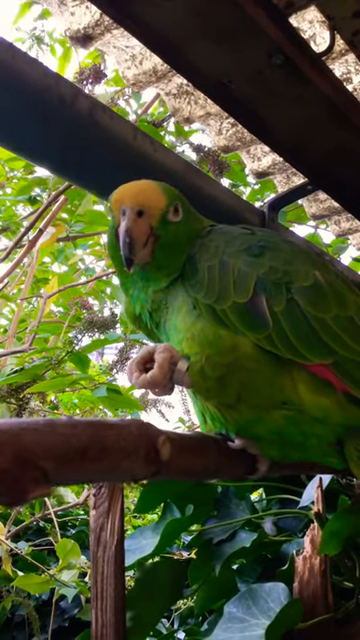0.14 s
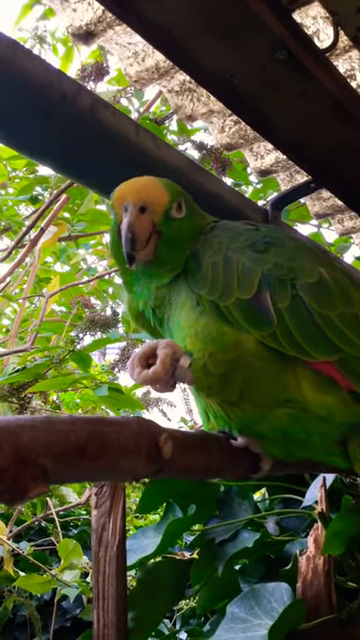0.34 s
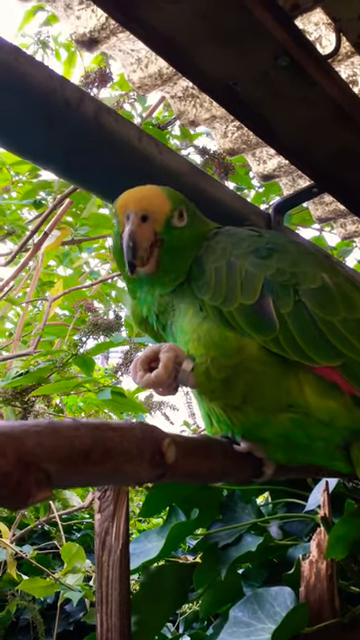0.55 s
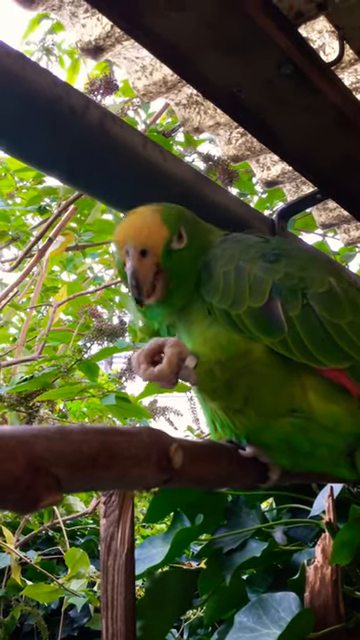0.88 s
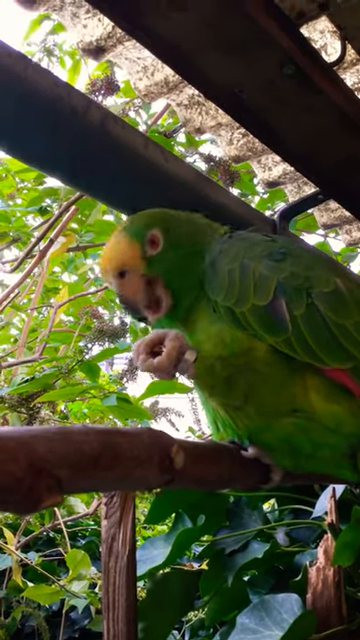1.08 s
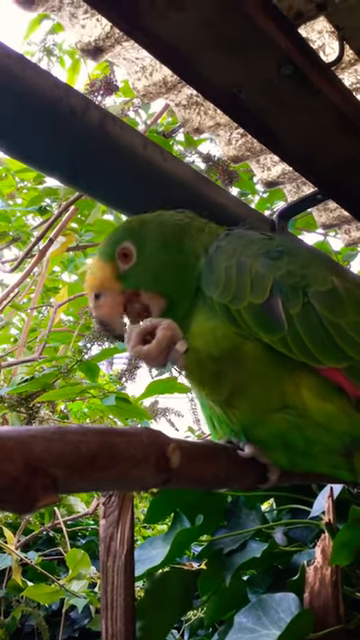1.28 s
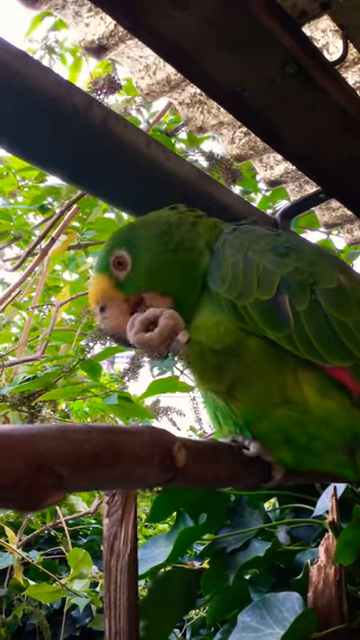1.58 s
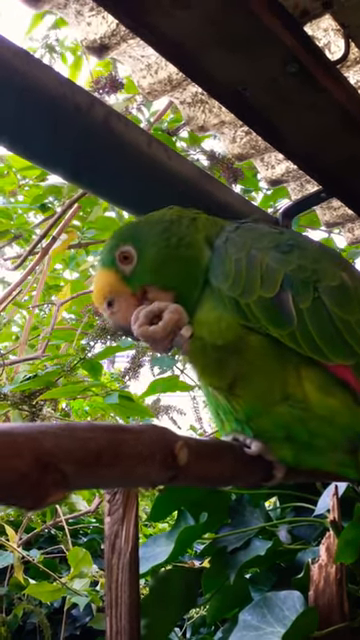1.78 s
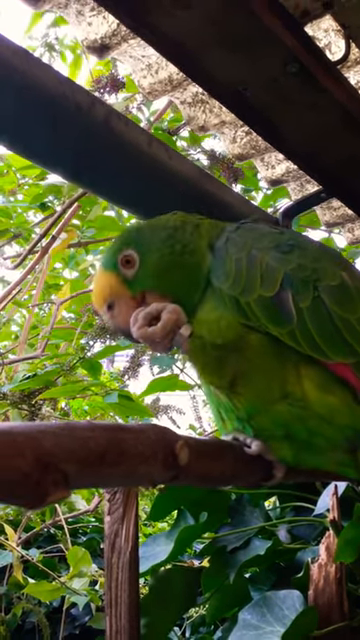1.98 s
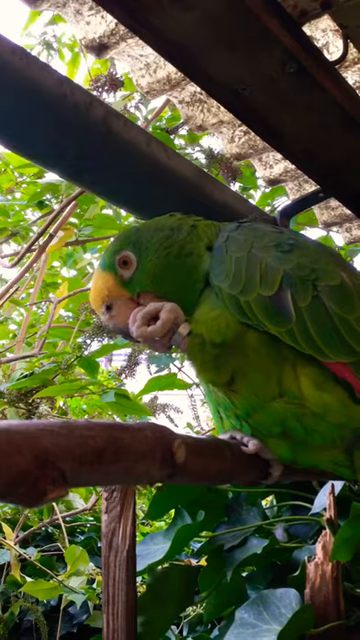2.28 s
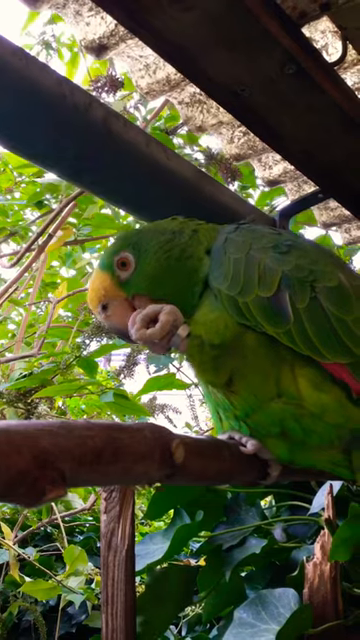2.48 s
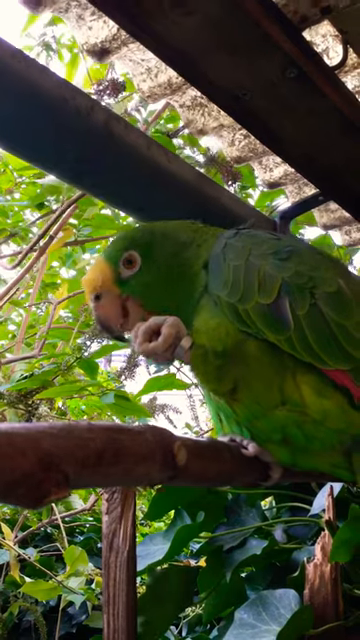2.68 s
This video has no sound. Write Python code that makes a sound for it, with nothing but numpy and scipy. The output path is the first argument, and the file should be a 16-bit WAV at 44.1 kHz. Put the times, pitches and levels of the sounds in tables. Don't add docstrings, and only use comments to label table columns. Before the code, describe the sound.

Nut shell cracked by a parrot's beak under a garden roof, heard close: tiny bright clicks grow denser, the shell splits with a brief hollow ring, crumbs crackle, while distant traffic slowly swells and a far saw starts.

```python
import sys
import numpy as np
from scipy import signal
from scipy.fft import rfft, irfft
from scipy.io import wavfile
from scipy.ndimage import uniform_filter1d

SR = 44100
rng = np.random.default_rng(int(sys.argv[2]) if len(sys.argv) > 2 else 0)


def put_to_file(sound):
    columns = np.atleast_2d(sound).T
    safe = np.clip(columns, -1, 1)
    whole_steps = np.round(safe * 32767)
    wavfile.write(sys.argv[1], SR, whole_steps.astype(np.int16))


def attenuation_scalar(level_db):
    decades = np.asarray(level_db, float) / 20
    return 10 ** decades


N = 125244

# (frequency [Hz], level [dB], t60 [s])
SHELL_MODES = [(950, 9.5, .03), (1230, 11, .02), (1560, 10, .031), (1775, 8, .03), (2148, 5, .038),
               (2350, 3, .016), (2881, 4, .028), (3522, 11, .022), (3949, 1, .036), (4670, 6, .02),
               (5076, 10, .008), (5500, 4, .024), (5950, -5, .03), (8090, -9, .04)]


def nibbles():
    # (time [s], peak level [dB], centre of the splinter ring [Hz])
    fractures = [(0.1208, -57.5, 10000), (.416, -66, 14600), (.627, -60, 14000), (.783, -65, 14400),
                 (.945, -67, 14000), (1.638, -64, 11000), (1.642, -53.5, 13700), (1.719, -56, 13600),
                 (1.9148, -51, 16500), (1.9235, -64, 14000), (1.9777, -50, 17000), (2.0098, -52.5, 12000),
                 (2.0132, -56, 11000), (2.092, -60, 13000), (2.094, -66, 12700), (2.1093, -37, 10000),
                 (2.1104, -43, 10500), (2.151, -59, 10000), (2.2516, -35, 11000), (2.2527, -31.5, 13000),
                 (2.2529, -42, 7400), (2.2873, -63, 10000), (2.2923, -55, 13000), (2.2945, -52, 9600),
                 (2.2946, -43, 17500), (2.446, -60, 10500), (2.563, -64, 11500), (2.648, -54, 13600),
                 (2.7475, -59, 13500), (2.771, -61, 13000)]
    # (frequency [Hz], level [dB], share of the decay [1])
    splinter = [(6000, -2, 1.6), (7900, -17, 1.7), (9500, 11, 1.6), (9800, -7, 1.3), (9980, 6, 1.4),
                (10800, 7, 1.9), (12700, 5, .9), (12700, -19, .9), (14200, 7, 1.2), (15100, 2, 1.0),
                (15500, 8, .9)]
    ring_db, ring_t60_s, ring_octaves = -11, .006, .38
    grit_db, grit_t60_s, grit_spread_db = -23, .012, 3
    rustle_db, rustle_per_s, rustle_hz = -76, 51, 13500
    modes = np.array(splinter) * [1, 1, ring_t60_s]
    age = np.arange(2000) / SR
    out = np.zeros(N)
    for at_s, db, hz in fractures:
        uneven = grit_spread_db * (rng.exponential(size=2000) - 1)
        grit = rng.standard_normal(2000) * attenuation_scalar(grit_db + uneven - 60 * age / grit_t60_s)
        grit[0] = 1
        snap = splinter_band(grit, hz)
        snap = snap / abs(snap[:40]).max()
        tone = strike(grit, modes, hz, ring_octaves)
        add(out, at_s, attenuation_scalar(db) * (snap + attenuation_scalar(ring_db) * tone))
    chance = rustle_per_s * attenuation_scalar(6.0 * walk(12)) / SR
    specks = (rng.random(N) < chance) * rng.standard_normal(N)
    return out + attenuation_scalar(rustle_db) * splinter_band(specks, rustle_hz)


def splinter_band(x, hz):
    edges_hz = [hz * (1 - .65 / 2), min(hz * (1 + .65 / 2), 19000)]
    return signal.sosfilt(signal.butter(3, edges_hz, "bp", fs=SR, output="sos"), x)


def cracks():
    # (time [s], peak level [dB], favoured pitch [Hz])
    blows = [
        (2.1094, -26.5, 3500),
        (2.1117, -46, 5500),
        (2.1137, -54, 1000),
        (2.1512, -42, 1790),
        (2.180, -53, 3000),
        (2.2475, -58, 3500),
        (2.1215, -58, 5500),
        (2.1511, -50, 3400),
    ]
    held_modes = np.array(SHELL_MODES) * [1, 0, .7]
    out = np.zeros(N)
    for at_s, db, hz in blows:
        if db > -35:
            blow = split()
        else:
            push = np.r_[np.hanning(int(SR / hz / 2)), np.zeros(4000)]
            blow = strike(push, held_modes, hz, octaves=.22)
        add(out, at_s, attenuation_scalar(db) * blow)
    return out


def split():
    rise_cycles, grip_s, grip_db = .5, .0028, -6.5
    age = np.arange(4000) / SR
    body = 0
    for hz, db, t60 in SHELL_MODES:
        rise = 1 - np.exp(-age * hz / rise_cycles)
        body = body + attenuation_scalar(db - 60 * age / t60) * rise * np.sin(2 * np.pi * hz * age)
    body = body * attenuation_scalar(grip_db * np.clip((age - grip_s) / .0008 + .5, 0, 1))
    return body / abs(body).max()


def strike(x, modes, pitch_hz, octaves):
    body = 0
    for hz, db, t60 in modes:
        off_pitch = np.log2(hz / pitch_hz) / octaves
        gain = attenuation_scalar(db + 3.8 * (rng.random() - .5) - 4.9 * off_pitch ** 2)
        body = body + gain * ring(x, hz, t60, rng.random())
    return body / abs(body).max()


def ring(x, hz, t60, phase):
    pole = np.exp(2j * np.pi * min(hz, .45 * SR) / SR - np.log(1000) / (t60 * SR))
    return (signal.lfilter([1], [1, -pole], x) * np.exp(2j * np.pi * phase)).imag


def add(out, at_s, grain):
    i = int(at_s * SR)
    out[i:i + len(grain)] += grain[:N - i]


def brushes(t):
    # (time [s], level [dB], length [s])
    puffs = [(.003, -77, 0.005), (0.11, -78, .015), (.345, -84, .012), (.419, -84, .004),
             (0.612, -78, 0.02), (.945, -80, .015), (1.923, -83, 0.018), (2.303, -78, .012),
             (2.324, -82, .002), (2.452, -84, .008), (2.56, -85, .015)]
    # (time [s], level [dB], t60 [s])
    crumbles = [
        (2.1105, -54, .035),
        (2.112, -68, .36),
        (2.151, -72, 0.055),
        (2.180, -85, 0.093),
    ]
    grain = rng.standard_normal(N) * attenuation_scalar(1.6 * walk(400))
    hiss = signal.sosfilt(signal.butter(2, 6200, "hp", fs=SR, output="sos"), grain)
    crackle = signal.sosfilt(signal.butter(1, 11000, fs=SR, output="sos"), hiss)
    puff_gain = sum(attenuation_scalar(db) * np.exp(-((t - at_s) / length) ** 2) for at_s, db, length in puffs)
    crumble_gain = 0
    for at_s, db, t60 in crumbles:
        fall_db = 60 * np.maximum(t - at_s, 0) / t60
        crumble_gain = crumble_gain + attenuation_scalar(db - fall_db) * (t > at_s)
    return hiss * puff_gain + crackle * crumble_gain


def roof_echo(nut):
    echo_db, t60_s, delay_s = -21, .08, .003
    tail = np.arange(8000) / SR
    roof = rng.standard_normal(8000) * attenuation_scalar(-60 * tail / t60_s) * (tail > delay_s)
    roof = roof / np.sqrt(np.sum(roof ** 2))
    return attenuation_scalar(echo_db) * signal.fftconvolve(nut, roof)[:N]


def saw(t):
    # (multiple of the shaft [1], level [dB])
    tones = np.array([(43, -19), (57, -21), (59, -20), (60, 0), (61, -20), (64, -19), (67, -20), (68, -21),
             (70, -20), (84, -26), (85, -27), (86, -26), (89, -24), (94, -26), (101, -27), (120, -25)])
    # (time [s], level [dB])
    loudness = [
        (2.28, -94),
        (2.33, -78),
        (2.46, -73),
        (2.52, -70),
        (2.63, -70),
        (2.68, -78),
        (2.75, -68),
        (2.84, -69),
    ]
    shaft_hz = 81.52 * (1 + .00053 * walk(4.4))
    turn = 2 * np.pi * np.cumsum(shaft_hz) / SR
    at_s, db = np.array(loudness).T
    load_db = np.interp(t, at_s, db, left=-160)
    side_db = -.6 * np.clip(load_db + 71, -8, 4) - 12 * (t - 2.5)
    overtone_fade_db = -60 * np.maximum(t - 2.6, 0)
    whine = 0
    for multiple, db in tones:
        tone_db = db + 5
        if multiple != 60:
            tone_db = tone_db + side_db + 4.2 * np.clip(walk(12), -2, 1)
        if multiple == 120:
            tone_db = tone_db + overtone_fade_db
        whine = whine + attenuation_scalar(tone_db) * np.sin(multiple * turn + 7 * rng.random())
    band = signal.butter(2, (6700, 9300), "bp", fs=SR, output="sos")
    hiss = signal.sosfilt(band, rng.standard_normal(N))
    return (whine + attenuation_scalar(side_db - 6) * hiss) * attenuation_scalar(load_db)


def traffic(t):
    # (frequency [Hz], level per Hz [dB])
    rumble = [(15, -41), (25, -49.5), (72, -2.5), (141, -3.5), (241, -5.5), (308, -11.5), (400, -10),
              (620, -21), (1200, -31), (1560, -45), (2640, -120)]
    # (time [s], level [dB])
    approach = [
        (0, -8.5),
        (.6, -5.5),
        (1.2, -3),
        (1.8, -2),
        (2.3, -1.5),
        (2.84, -1),
    ]
    near_db = np.interp(t, *np.array(approach).T)
    peak_hz, spread_octaves = 406, 1.41

    def lift_db(octave):
        return near_db * np.exp(-((octave - np.log2(peak_hz)) / spread_octaves) ** 2)

    return air(rumble, -44, lift_db)


def garden():
    # (frequency [Hz], level per Hz [dB])
    leaves = [(1000, -7), (1400, 0), (2600, -6), (5300, -10), (7200, -26), (9300, -24), (11000, -29.5),
              (15700, -29.5)]
    return air(leaves, -66.5, lambda octave: 0)


def air(colour_table, total_db, lift_db):
    swell_db, flicker_db = -.52, .5
    octave = np.log2(np.maximum(np.fft.rfftfreq(N, 1 / SR), 1))
    hz, db = np.array(colour_table).T
    colour = attenuation_scalar(np.interp(octave, np.log2(hz), db, left=-150, right=-150))
    spectrum = rfft(rng.standard_normal(N)) * colour
    out, swell = 0, walk(.71)
    for centre in np.arange(4, 14.6, .5):
        band = irfft(spectrum * np.clip(1 - abs(octave - centre) * 2, 0, 1), N)
        out = out + band * attenuation_scalar(swell_db * swell + flicker_db * walk(8.64) + lift_db(centre))
    return out * attenuation_scalar(total_db) / np.std(out)


def hums():
    # (frequency [Hz], rms level [dB])
    machines = [(716, -85.5), (1416, -79), (1771, -78.5), (1793, -79.5), (2536, -95)]
    out = 0
    for hz, db in machines:
        phase = 2 * np.pi * np.cumsum(hz + 3.22 * walk(6)) / SR
        out = out + attenuation_scalar(db + 1.5 + 2.0 * walk(6.7)) * np.sin(phase)
    return out


def walk(rate):
    k = int(SR / rate)
    steps = np.repeat(rng.standard_normal(N // k + 1), k)
    return 1.22 * uniform_filter1d(uniform_filter1d(steps, k), k)[:N]


def scene():
    t = np.arange(N) / SR
    nut = nibbles() + cracks() + brushes(t)
    mix = nut + roof_echo(nut) + saw(t) + traffic(t) + garden() + hums()
    return mix[None]


def low_pass(x):
    return signal.sosfilt(signal.butter(12, 16580, fs=SR, output="sos"), x)


def record(dry):
    dry = dry * np.clip((N - np.arange(N)) / SR / .003, 0, 1)
    microphone = signal.ellip(6, .5, 40, 16250, fs=SR, output="sos")
    return low_pass(signal.sosfilt(microphone, dry))


dry = scene()
out = record(dry)
put_to_file(out)
```